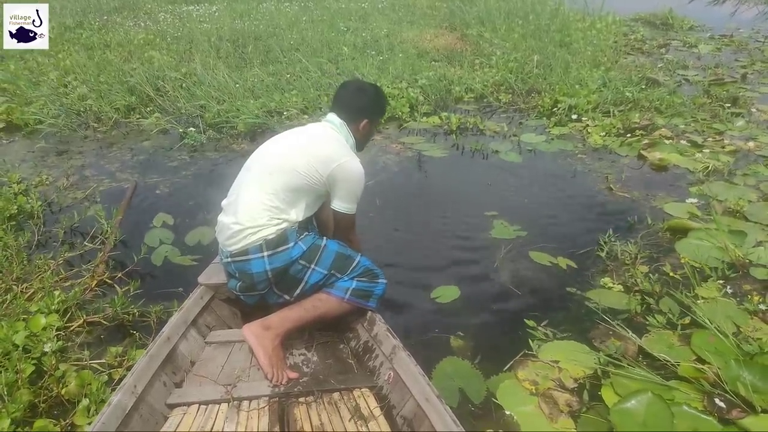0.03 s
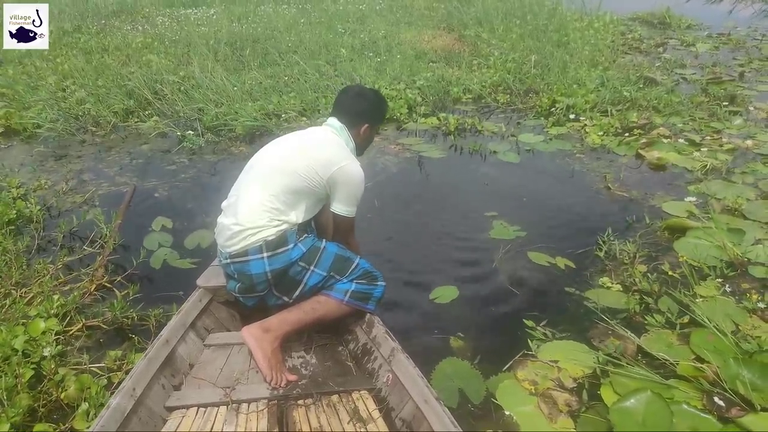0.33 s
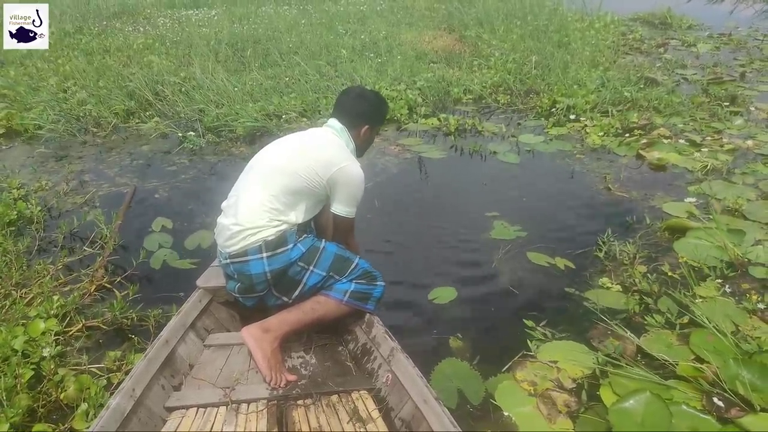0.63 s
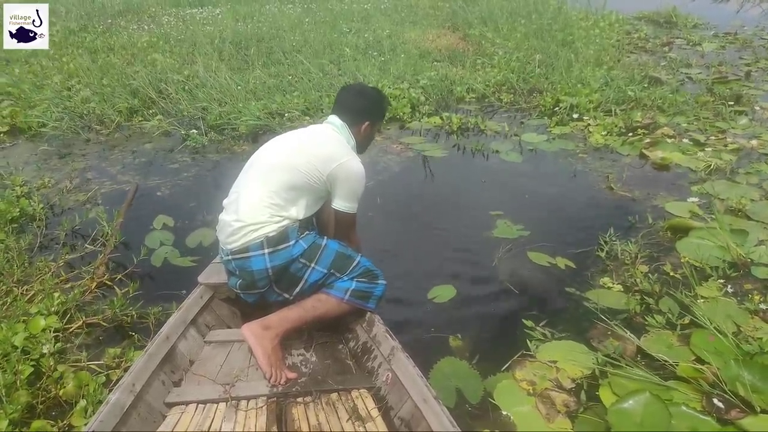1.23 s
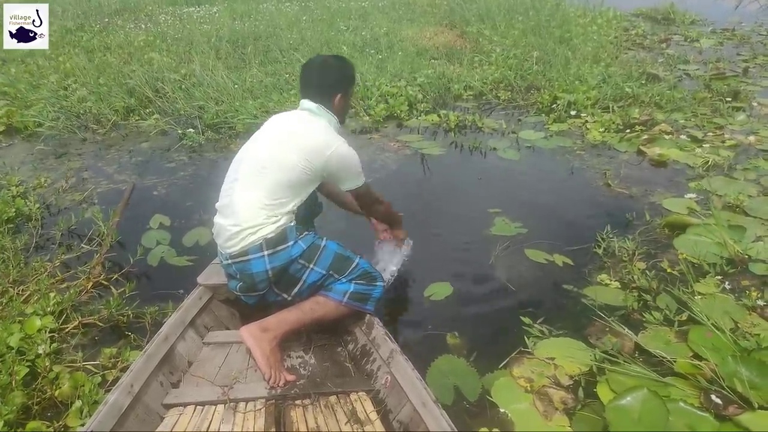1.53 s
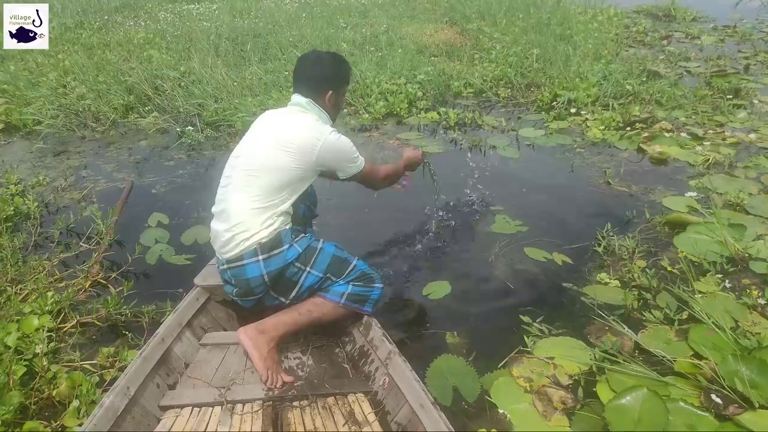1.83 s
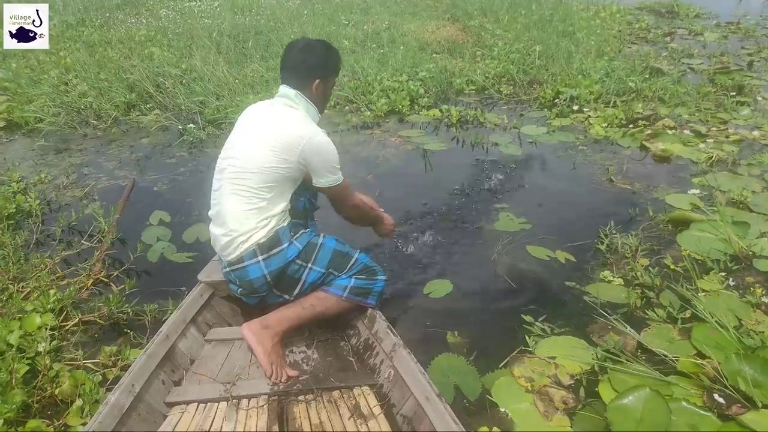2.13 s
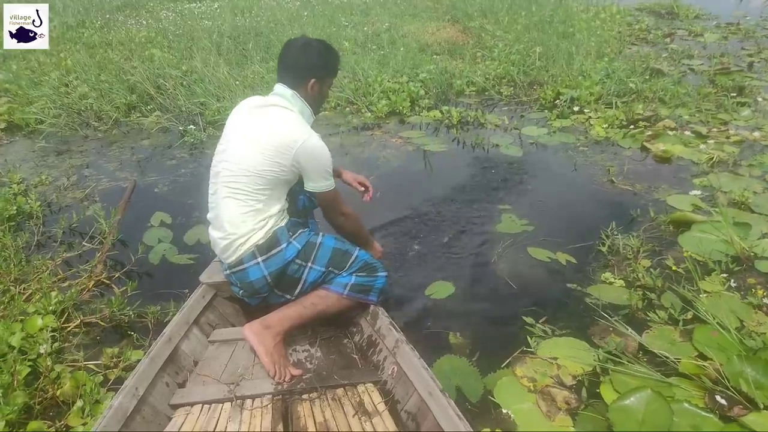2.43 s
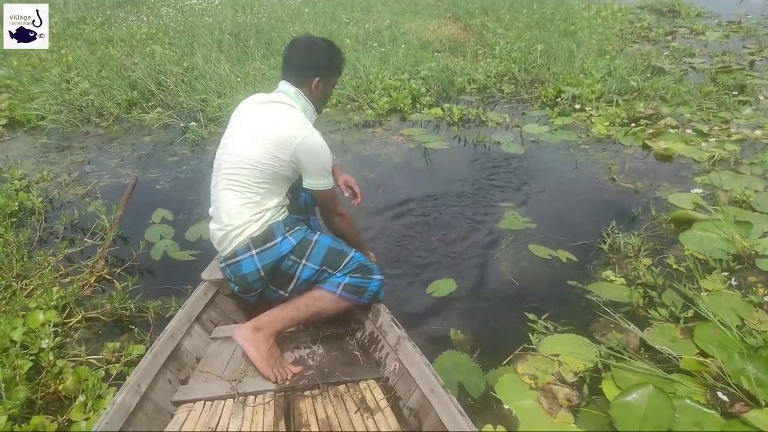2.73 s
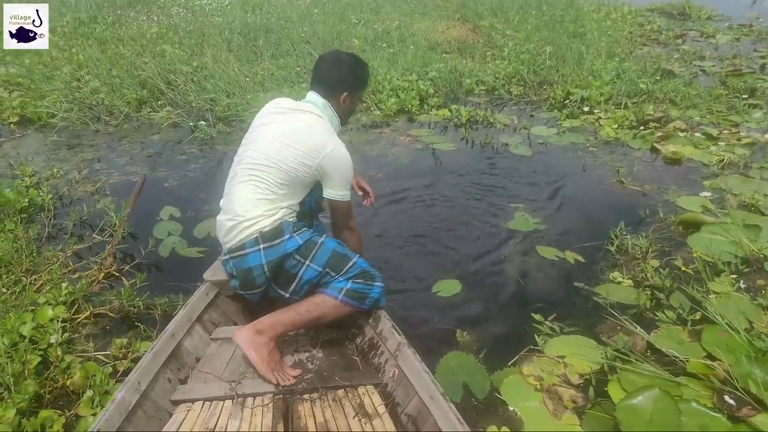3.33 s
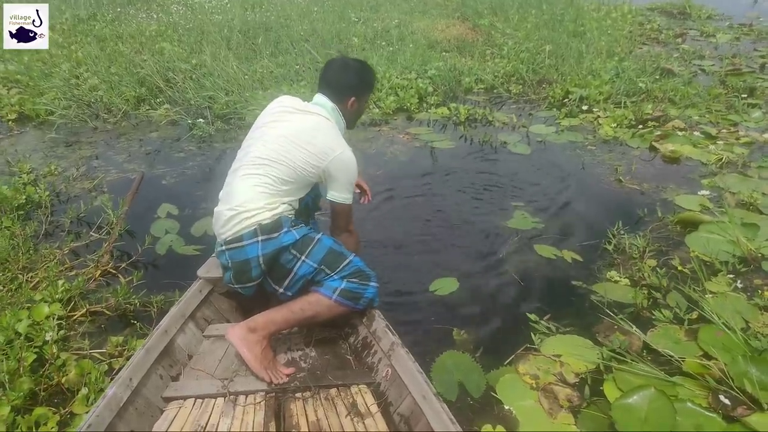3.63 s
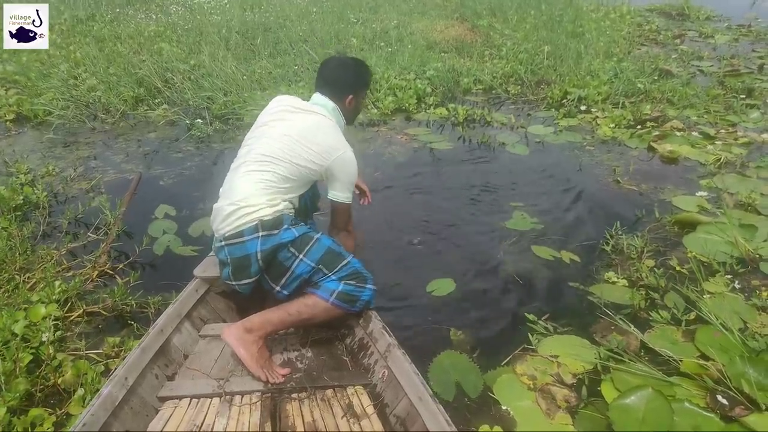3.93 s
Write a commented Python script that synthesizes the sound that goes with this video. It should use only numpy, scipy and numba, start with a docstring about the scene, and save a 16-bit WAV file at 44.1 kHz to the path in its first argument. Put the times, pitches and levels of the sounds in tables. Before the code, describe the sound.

A sudden splash of hand-thrown water gurgles, sprays and rains back onto an open pond. Light wind rumbles on the microphone the whole time, and a couple of dull knocks sound close on the right afterwards.

```python
"""On a pond, beside a wooden boat. A hand scoops water and flings it out: trapped air gulps and rings as
bubbles, the sheet tears into a hiss of spray, drops patter back and the hand dabbles on. Light wind rumbles on
each of the microphone's two ports separately and buffets the right one, at times striking it with a dull knock.
Far behind are the faint hiss of the marsh and thin bird whistles."""
import sys
import numpy as np
from scipy import signal
from scipy.fft import rfft, irfft
from scipy.io import wavfile
from scipy.ndimage import uniform_filter1d
from numba import njit

SR = 44100
rng = np.random.default_rng(int(sys.argv[2]) if len(sys.argv) > 2 else 0)


def log_audio(samples):
    """Write samples as a 16-bit WAV file to the path given in sys.argv[1]."""
    # one column per channel
    frames = np.atleast_2d(samples).T
    # limit to full scale, then quantise
    limited = np.clip(frames, -1, 1)
    pcm = np.round(limited * 32767).astype(np.int16)
    wavfile.write(sys.argv[1], SR, pcm)


N = 176400
TOP_HZ = 15500
PORT_LAG_S, LAG_SCATTER_S = .00012, .00006  # the water reaches the left port later

# Swarms of bubbles beside the boat: t/s, rise/s, hold/s, fade/s, level/dB, f/Hz, spread/octaves
BUBBLE_SWARMS = [(1.441, 0.0064, 0.032, 0.03, -37.5, 726, 0.2),
                 (1.437, 0.007, 0.17, 0.055, -46, 1380, 0.21),
                 (1.436, 0.021, 0.056, 0.13, -46.5, 2310, 0.32),
                 (1.488, 0.008, 0.029, 0.14, -51.5, 710, 0.22), (1.81, 0.09, 0.25, 0.064, -64, 1420, 0.64),
                 (2.03, 0.04, 0.081, 0.053, -51, 1450, 0.44), (2.0, 0.1, 0.055, 0.034, -53, 808, 0.3),
                 (2.19, 0.017, 0.14, 0.036, -64, 1440, 0.69), (2.325, 0.012, 0.025, 0.02, -57, 660, 0.11),
                 (2.525, 0.023, 0.042, 0.069, -57, 825, 0.14)]
def bubble_clouds(per_s=800, cycles=9.6, rise_octaves=.19, scatter_db=2.5):
    """Air folded into the water rings as swarms of short rising bubbles."""
    out = np.zeros((2, N))
    for start, rise, hold, fade, db, hz, spread in BUBBLE_SWARMS:
        jitter, pitch_rank, life, size_rank = rng.random(size=(500, 4)).T
        at = start + (np.arange(len(jitter)) + jitter) / per_s
        octaves = spread * np.clip(np.log(pitch_rank / (1 - pitch_rank)) / 2, -2, 2)
        gain = undb(scatter_db * np.minimum(-np.log(size_rank), 3))
        glide = rise_octaves * 2 * life
        swarm = rings(at, hz * 2 ** octaves, cycles * (.5 + life), gain, glide, lags(len(at)))
        envelope = swell(start, rise, hold, fade)
        out += undb(db) * unit(swarm * envelope) * np.sqrt(np.mean(envelope ** 2))
    return out


# Plops and plinks: t/s, level/dB, f/Hz, ring/cycles, glide/octaves per ring
PLOPS = [(1.415, -46, 1380, 16, 0.2), (1.478, -33.5, 763, 20, 0.06), (1.535, -26.5, 1300, 17, -0.3),
         (1.535, -26, 3380, 47, 0.15), (1.558, -29, 1380, 16, 0.35), (1.574, -33, 1520, 14, 0),
         (1.599, -33.5, 1264, 57, .05), (1.768, -42, 2070, 48, -0.011), (1.779, -43, 2350, 24, 0.25),
         (1.902, -42.5, 2060, 31.7, 0.3), (1.923, -39, 2830, 40, 0.099), (1.932, -41, 2110, 26, 0.18),
         (2.041, -43.5, 1145, 21, 0.51), (2.063, -42, 2340, 30, .05), (2.074, -41, 1410, 14, 0.21),
         (2.097, -33.5, 1330, 26, -0.05), (2.099, -32.5, 668, 13, -0.003), (2.119, -37, 1570, 16, .1),
         (2.138, -30, 1240, 14, .2), (2.145, -33.5, 1480, 14, .1), (2.151, -37, 2270, 33, .1),
         (2.153, -34, 670, 6.6, .1), (2.171, -39, 1220, 14, 0.6), (2.183, -39.5, 972, 31, -0.21),
         (2.231, -50, 1330, 21, .5), (2.255, -50, 1230, 20, 0.3), (2.291, -43.5, 1206, 16, 0.98),
         (2.328, -53, 1560, 35, -0.1), (2.357, -50.5, 1640, 50, 0.24), (2.381, -51, 878, 32, 0.3),
         (2.394, -53, 1200, 34, 0.8), (2.592, -50, 875, 14, 0.13), (2.646, -45, 850, 13, 0.088)]
def single_bubbles():
    """Larger bubbles ring out above the swarms, each on its own note."""
    at, db, hz, cycles, glide = np.array(PLOPS, float).T.copy()
    return rings(at, hz, cycles, undb(db), glide, np.full(len(at), PORT_LAG_S))


# Fine spray over the pond: t/s, level/dB
SPRAY_LEVEL = [(1.39, -78), (1.435, -62), (1.46, -49.5), (1.53, -51), (1.63, -50.5), (1.71, -49.5),
               (1.8, -51.5), (1.86, -56), (1.91, -51.5), (1.98, -53), (2.06, -50), (2.15, -49),
               (2.225, -61), (2.34, -65.5), (2.42, -66.5), (2.51, -69.5), (2.55, -63.5), (2.66, -68.5),
               (2.72, -75.5), (2.9, -71), (3.0, -73), (3.975, -76.5), (3.99, -51.5)]
# Spectrum of the droplets: f/Hz, level/dB
SPRAY_SPECTRUM = [(1200, -14), (2000, -8.5), (3200, -2.5), (4500, -2.5), (6000, -4), (7000, 0), (7800, 3.5),
                  (8900, -0.5), (9900, -10), (12000, -9.5), (15000, -22.5)]
def spray(droplets_per_s=750, decay_s=.0013, bubbles_per_s=600, fizz_db=-3.5, spatter_db=2.5):
    """The sheet of water tears and falls in spatters; droplets tick and leave tiny ringing bubbles."""
    landings = rng.random(N) < droplets_per_s / SR
    tick_power = signal.lfilter([1], [1, -np.exp(-1 / (decay_s * SR))], landings.astype(float))
    ticks = unit(colour(np.sqrt(tick_power) * rng.standard_normal((2, N)), SPRAY_SPECTRUM))
    jitter, pitch_rank, life, size_rank = rng.random(size=(5000, 4)).T
    at = (np.arange(len(jitter)) + jitter) / bubbles_per_s
    gain = undb(np.minimum(-np.log(size_rank), 4.5))
    lag = 2 * (lags(len(at)) - PORT_LAG_S)  # spread wide, to both sides of the microphone
    fizz = rings(at, hz=2046 + 6974 * pitch_rank, cycles=45 * (.5 + life),
                 gain=gain, glide=.19 * life, lag=lag)
    fizz = undb(fizz_db) * unit(colour(fizz, SPRAY_SPECTRUM))
    hiss = unit(highpass(ticks + fizz, hz=1460))
    return hiss * undb(curve(SPRAY_LEVEL) + spatter_db * walk(per_s=50))


# The hand breaks the surface, throws, and the water lands: t/s, rise/s, hold/s, fade/s, level/dB
GUSH_SWELLS = [(1.441, .004, .025, 0.13, -45.5), (1.489, .004, .014, .012, -41.5),
               (2.04, .04, .08, .03, -54)]
def gushes():
    """Droplets come so thickly that they merge into a smooth rush."""
    rush = unit(highpass(colour(rng.standard_normal((2, N)), SPRAY_SPECTRUM), hz=1200))
    power = sum((undb(db) * swell(start, rise, hold, fade)) ** 2
                for start, rise, hold, fade, db in GUSH_SWELLS)
    return rush * np.sqrt(power)


# Big drops landing on the pond: t/s, level/dB, band centre f/Hz
DROP_HITS = [(1.368, -41, 6900), (1.454, -35, 7400), (1.495, -37, 6000), (1.535, -30, 7000),
             (1.577, -34, 3000), (1.632, -30, 5500), (1.66, -34, 7300), (1.719, -32, 7560),
             (1.796, -29.5, 8000), (1.808, -26, 7950), (1.903, -28, 6840), (1.904, -35.5, 2400),
             (1.9455, -23.5, 8100), (1.968, -35, 7700), (1.996, -42, 3500), (2.065, -39, 6900),
             (2.105, -30, 7000), (2.137, -38, 6500), (2.152, -37, 4000), (2.183, -31.5, 1750),
             (2.206, -34, 7900), (2.2092, -31, 6900), (2.2675, -31.5, 6150), (2.29, -25.5, 7000),
             (2.324, -37.5, 7650), (2.44, -49, 3800), (2.5156, -39, 7560), (2.884, -39.5, 7000),
             (2.888, -49, 4004), (3.087, -45.5, 3950), (3.170, -45, 5800)]
# Tone shared by all the drops: f/Hz, level/dB
DROP_TONE = [(500, -5), (1500, 3.5), (6000, -10), (7800, 1), (9000, -6.5), (10000, -9), (15000, -12)]
def drops(decay_s=.0016, band_octaves=.7):
    """Each big drop slaps the surface with a tick a few milliseconds long."""
    out, t = np.zeros((2, N)), np.arange(1024) / SR
    for at, db, hz in DROP_HITS:
        edges = np.minimum(hz * 2 ** (np.array([-.5, .5]) * band_octaves), TOP_HZ)
        for port in out:
            slap = rng.standard_normal(len(t)) * np.exp(-t / decay_s)
            tick = signal.lfilter(*signal.butter(1, edges, "band", fs=SR), slap)
            add(port, at, undb(db) * tick / np.abs(tick).max())
    return colour(out, DROP_TONE)


# Strokes of the hand beside the boat: t/s, rise/s, fade/s, level/dB, f/Hz
HAND_STROKES = [(1.06, 0.0076, 0.017, -63.5, 2400), (1.412, 0.027, 0.0092, -49.5, 1790),
                (1.442, .004, 0.044, -46.5, 1500), (2.525, 0.031, 0.07, -63.5, 2400),
                (2.635, .012, 0.026, -65.5, 2400), (2.882, 0.0085, 0.0073, -61.5, 1700),
                (3.357, 0.007, 0.047, -54.5, 1990), (3.59, 0.013, 0.025, -62.5, 2020),
                (3.982, 0.008, 0.037, -46, 1660)]
# Spectrum of a stroke: multiple of its f, level/dB
STROKE_SPECTRUM = [(.15, -19), (.35, 5), (.6, -10), (1, 3.5), (1.4, -5.5), (2, -18.5), (4, -19.5), (5, -29),
                   (8, -64)]
def swishes():
    """The hand brushes through the surface with a soft rush."""
    out = np.zeros((2, N))
    for start, rise, fade, db, hz in HAND_STROKES:
        spectrum = [(hz * ratio, level) for ratio, level in STROKE_SPECTRUM]
        rush = unit(colour(rng.standard_normal((2, N)), spectrum))
        out += undb(db) * swell(start, rise, 0, fade) * rush
    return out


# The water at the microphone, left port minus right: f/Hz, level/dB
PORT_BALANCE = [(300, 4), (700, 2.5), (1300, 2.5), (2400, -2), (4400, -1), (6000, 0), (7800, -10.5),
                (9500, 4), (11000, -3), (13000, 15), (15000, 19)]
def at_ports(water, echo_db=-18, decay_s=.03):
    """A faint short echo off the bank follows the water; each port colours both in its own way."""
    t = np.arange(8192) / SR
    echo = rng.standard_normal((2, len(t))) * np.exp(-t / decay_s) * np.sqrt(2 / (decay_s * SR))
    arriving = water + undb(echo_db) * signal.fftconvolve(water, echo, axes=1)[:, :N]
    return np.array([colour(port, [(hz, side * db / 2) for hz, db in PORT_BALANCE])
                     for port, side in zip(arriving, (1, -1))])


# Wind strength right on the microphone: t/s, left level/dB, right level/dB
WIND_STRENGTH = [(0, -36.5, -48.5), (.12, -48, -42.5), (.22, -40, -35.5), (.5, -38.5, -33.5),
                 (.8, -35.5, -41.5), (1.03, -36.5, -39), (1.14, -39.5, -45.5), (1.3, -41.5, -40),
                 (1.6, -42.5, -41), (1.73, -41.5, -42), (1.86, -32.5, -37), (2.3, -37.5, -33),
                 (2.47, -39, -40), (2.56, -32.5, -32.5), (2.8, -40.5, -44), (2.98, -32, -40.5),
                 (3.3, -36.5, -31.5), (3.48, -38, -40.5), (3.68, -38, -39.5), (3.72, -29.5, -35.5),
                 (4, -33.5, -28.5)]
# Spectrum of the large, slow turbulence: f/Hz, level/dB
RUMBLE_SPECTRUM = [(15, -32.5), (30, 3), (50, 3), (100, -3), (170, -2), (230, -10.5), (320, -19),
                   (450, -32), (700, -37.5), (1500, -71), (6000, -100)]
# Spectrum of the small eddies: f/Hz, level/dB
EDDY_SPECTRUM = [(60, -14), (180, 5.5), (300, -4.5), (450, -11), (700, -34), (1500, -38), (6000, -100)]
def wind(base_db=-39, flutter_db=2.5, eddy_db=-13.5, eddy_growth=1.24):
    """Turbulence rumbles on each port; smaller, brighter eddies grow faster with its strength."""
    ports = []
    for column in (1, 2):
        gust_db = curve(WIND_STRENGTH, column) - base_db + flutter_db * walk(per_s=22)
        rumble = unit(colour(rng.standard_normal(N), RUMBLE_SPECTRUM))
        eddies = unit(colour(rng.standard_normal(N), EDDY_SPECTRUM))
        ports.append(rumble * undb(gust_db) + eddies * undb(eddy_db + eddy_growth * gust_db))
    return undb(base_db) * np.array(ports)


# Puffs of wind on the right port: middle t/s, length/s, level/dB, f/Hz
PUFFS = [(.19, .08, -38, 170), (0.241, 0.031, -34, 101.3), (.285, 0.035, -33, 178),
         (0.371, 0.04, -28.5, 222), (.398, 0.023, -32, 228), (0.437, 0.041, -27, 230),
         (0.794, 0.037, -30, 93), (1.012, 0.022, -27.5, 77), (1.181, .014, -33, 295),
         (1.201, 0.037, -26, 190), (1.22, 0.021, -31.5, 268), (1.608, 0.032, -27, 44),
         (1.856, 0.029, -26.5, 133), (2.0, 0.025, -26.5, 141), (2.085, 0.014, -27, 165),
         (2.281, 0.031, -32.5, 205), (2.403, 0.031, -28, 69.5), (2.538, 0.021, -28, 161),
         (2.975, 0.02, -22, 278), (3.071, 0.051, -27, 159), (3.231, 0.042, -32, 202),
         (3.253, 0.013, -28, 306), (3.308, 0.027, -23.5, 71.4), (3.405, 0.04, -27, 172),
         (3.725, 0.05, -29, 131), (3.886, 0.048, -28.5, 208), (3.958, 0.015, -32.5, 270)]
# Spectrum of a puff: multiple of its f, level/dB
PUFF_SPECTRUM = [(.1, -0.5), (.5, -1.5), (1, 2.5), (1.6, -8), (2.6, -25.5), (4, -47), (8, -74), (24, -100)]
def buffets():
    """Single eddies thud against the windward right port."""
    out, t = np.zeros((2, N)), (np.arange(8192) - 4096) / SR
    for at, length, db, hz in PUFFS:
        envelope = np.cos(np.pi * np.clip(t / length, -.5, .5))
        spectrum = [(hz * ratio, level) for ratio, level in PUFF_SPECTRUM]
        puff = unit(colour(rng.standard_normal(len(t)) * envelope, spectrum))
        add(out[1], at + t[0], undb(db) * puff * np.sqrt(length * SR / len(t)))
    return out


# Dull knocks of the wind on the right port: t/s, level/dB, f/Hz
WIND_KNOCKS = [(0.429, -24, 230), (2.973, -10, 335), (3.249, -23, 350)]
def knocks(cycles=7., left_db=-22):
    """Each dull knock rings for a few cycles and barely reaches the left port."""
    at, db, hz = np.array(WIND_KNOCKS, float).T.copy()
    zeros = np.zeros(len(at))
    thuds = rings(at, hz, np.full(len(at), cycles), undb(db), glide=zeros, lag=zeros)
    return thuds * undb([[left_db], [0]])


# Open air all around the pond: f/Hz, level/dB
AIR_SPECTRUM = [(400, -7.5), (700, 0.5), (1000, -5.5), (1500, -10), (2600, -12.5), (3500, -18),
                (5200, -20.5), (6500, -18.5), (7800, -11), (9000, -17.5), (9700, -27.5), (12500, -29),
                (13500, -40)]
def air(db=-66.5):
    """The open marsh gives a faint steady hiss."""
    hiss = colour(rng.standard_normal((2, N)), AIR_SPECTRUM)
    return undb(db) * unit(highpass(hiss, hz=465))


# Whistles far from the microphone: t/s, length/s, level/dB, first f/Hz, last f/Hz
FAR_WHISTLES = [(.035, .11, -78, 4200, 3950), (.1, .19, -74.5, 3120, 2740), (.3, .25, -77, 1830, 1780)]
def birds(waver=.028):
    """Distant birds whistle, each note a wavering downward glide."""
    out = np.zeros(N)
    for at, length, db, from_hz, to_hz in FAR_WHISTLES:
        n = int(length * SR)
        hz = np.linspace(from_hz, to_hz, n) * (1 + waver * walk(per_s=300)[:n])
        add(out, at, undb(db) * np.hanning(n) * np.sin(2 * np.pi * np.cumsum(hz) / SR))
    return out


@njit
def rings(start, hz, cycles, gain, glide, lag):
    """Damped sines fall 40 dB and move `glide` octaves over their cycles; the left port lags."""
    out = np.zeros((2, N))
    for k in range(len(start)):
        first, n, phase = int(start[k] * SR), cycles[k] * SR / hz[k], 0.
        for i in range(max(0, min(int(1.3 * n), N - first))):
            phase += 2 * np.pi * hz[k] * 2 ** (glide[k] * i / n) / SR
            envelope = gain[k] * np.exp(-4.6 * i / n) * (1 - np.exp(-phase / 2.5))
            out[0, first + i] += envelope * np.sin(phase - 2 * np.pi * hz[k] * lag[k])
            out[1, first + i] += envelope * np.sin(phase)
    return out


def lags(count):
    """Seconds between the ports for bubbles scattered over the water, each in its own direction."""
    return PORT_LAG_S + LAG_SCATTER_S * rng.standard_normal(count)


def swell(start, rise, hold, fade):
    """Rise, hold and exponential fade."""
    t = np.arange(N) / SR - start
    return np.clip(t / rise, 0, 1) * np.exp(-np.maximum(t - rise - hold, 0) / fade)


def undb(db):
    """Decibels to gain."""
    return 10 ** (np.asarray(db) / 20)


def unit(x):
    """Scale to rms 1."""
    return x / np.sqrt(np.mean(x ** 2) + 1e-20)


def curve(rows, column=1):
    """Join the rows of a time table by straight lines."""
    rows = np.array(rows, float)
    return np.interp(np.arange(N) / SR, rows[:, 0], rows[:, column])


def colour(x, points):
    """Filter by points of f/Hz, level/dB."""
    points, n = np.array(points, float), x.shape[-1]
    hz = np.maximum(np.fft.rfftfreq(n, 1 / SR), 1)
    db = np.interp(np.log(hz), np.log(points[:, 0]), points[:, 1])
    return irfft(rfft(x) * undb(db), n)


def highpass(x, hz):
    """Take away the lows."""
    return signal.sosfilt(signal.butter(3, hz, "high", fs=SR, output="sos"), x)


def walk(per_s):
    """Smooth random wandering of rms 1."""
    hold = max(int(SR / per_s), 1)
    steps = np.repeat(rng.standard_normal(N // hold + 1), hold)
    return unit(uniform_filter1d(steps, hold)[:N])


def add(out, start, x):
    """Mix a short sound in at a time."""
    i = int(np.clip(start * SR, 0, N - 1))
    out[i:i + len(x)] += x[:N - i]


def scene():
    """Water beside the boat, wind and knocks at the microphone, marsh air and birds beyond."""
    water = bubble_clouds() + single_bubbles() + spray() + gushes() + drops() + swishes()
    return at_ports(water) + wind() + buffets() + knocks() + air() + birds()


def record(dry):
    """The recorder cuts off steeply above TOP_HZ."""
    return signal.sosfilt(signal.ellip(10, .2, 80, TOP_HZ, fs=SR, output="sos"), dry)


dry = scene()
out = record(dry)
log_audio(out)
```